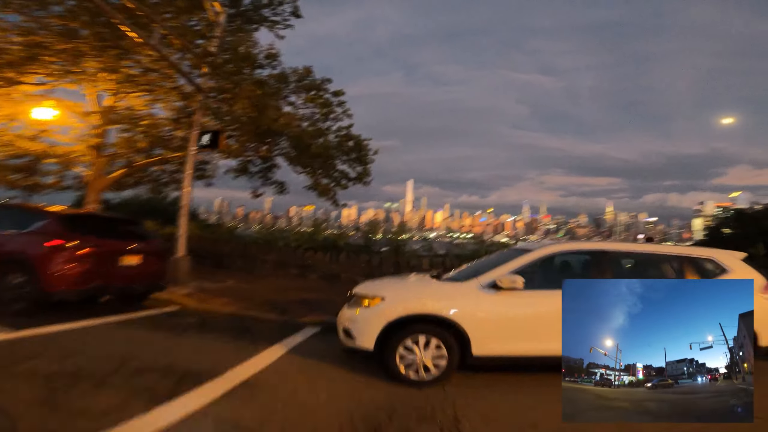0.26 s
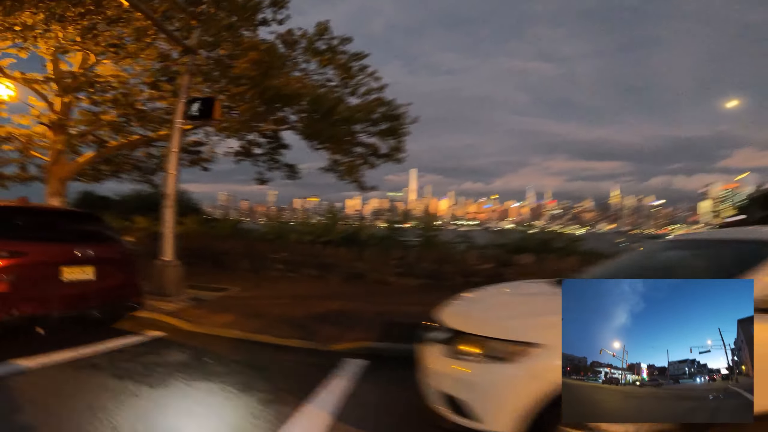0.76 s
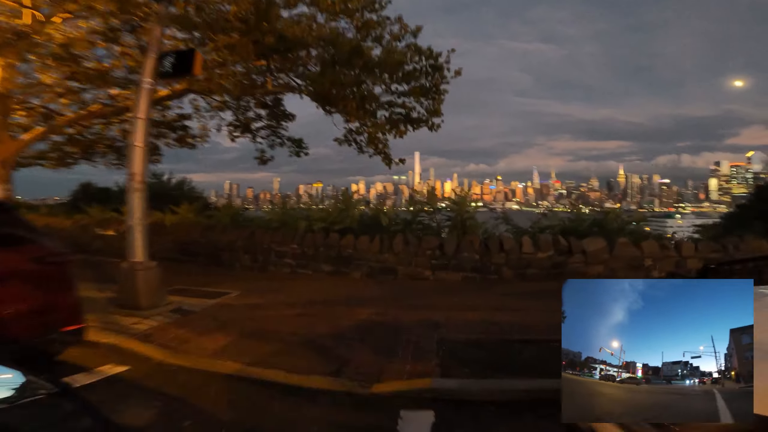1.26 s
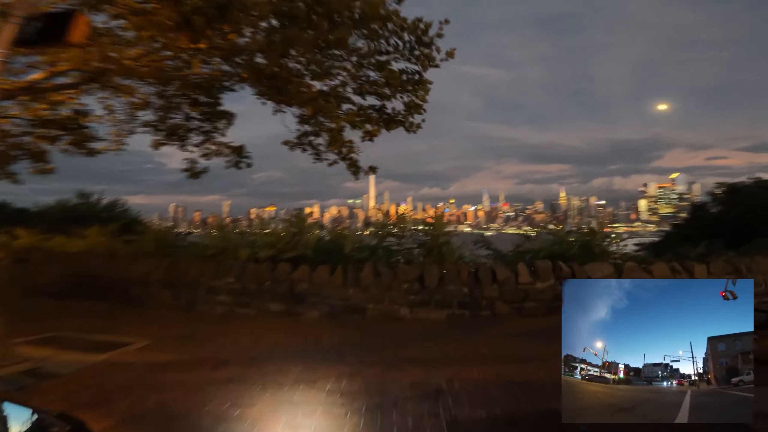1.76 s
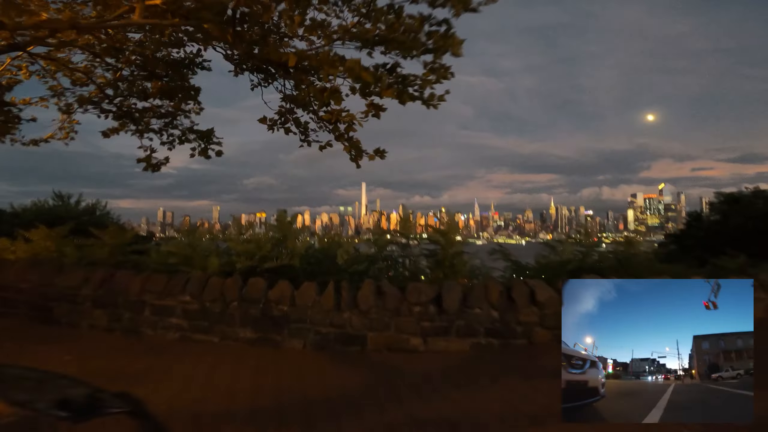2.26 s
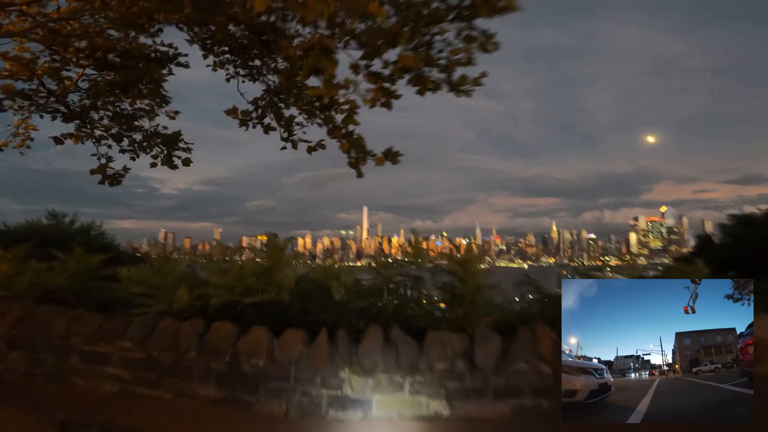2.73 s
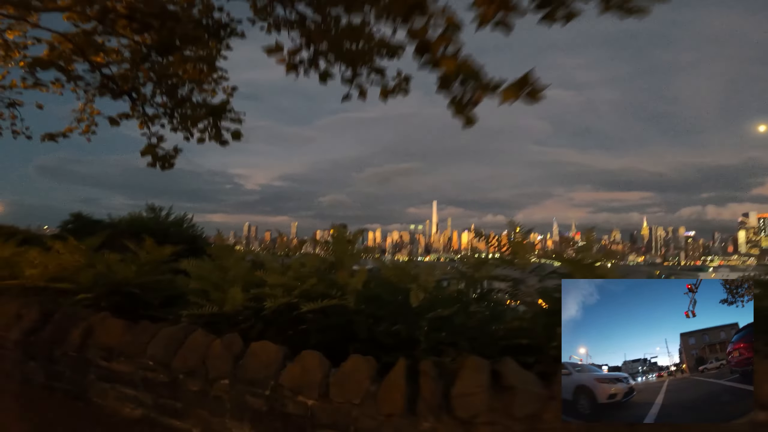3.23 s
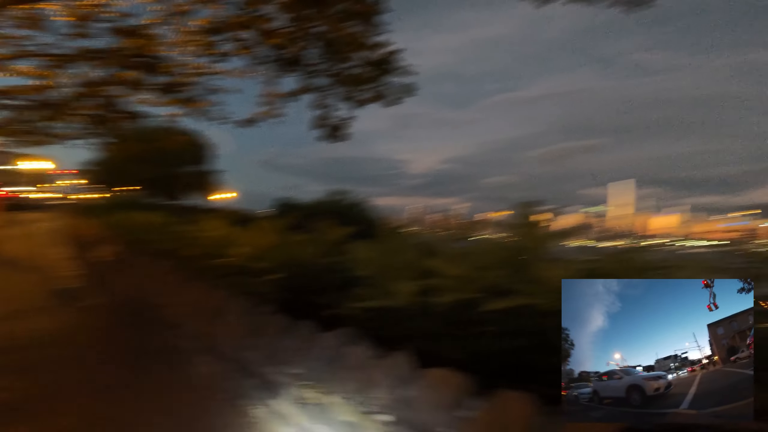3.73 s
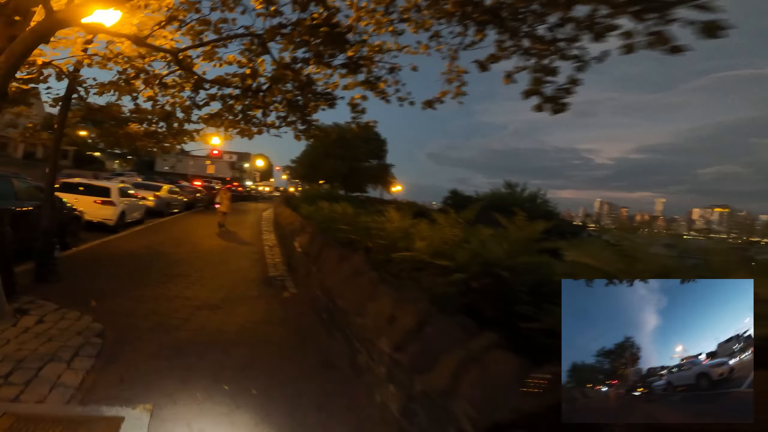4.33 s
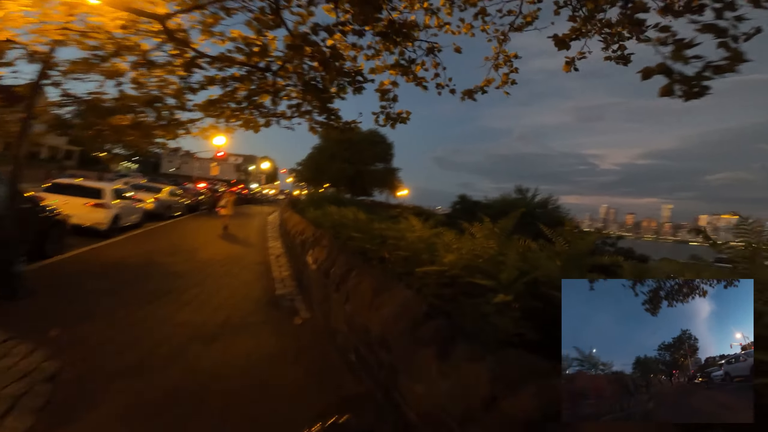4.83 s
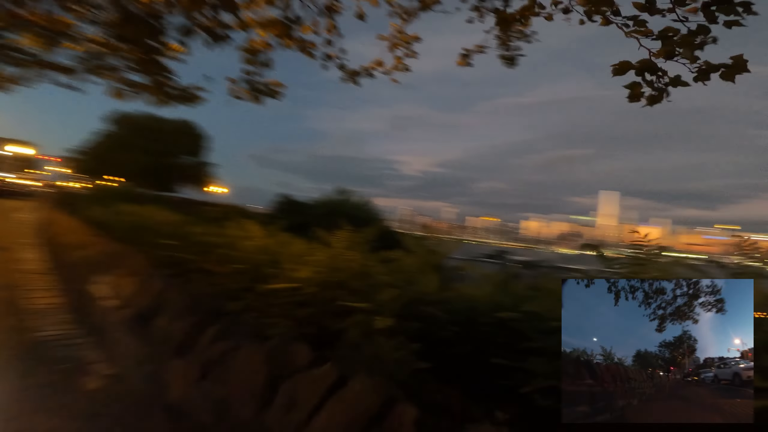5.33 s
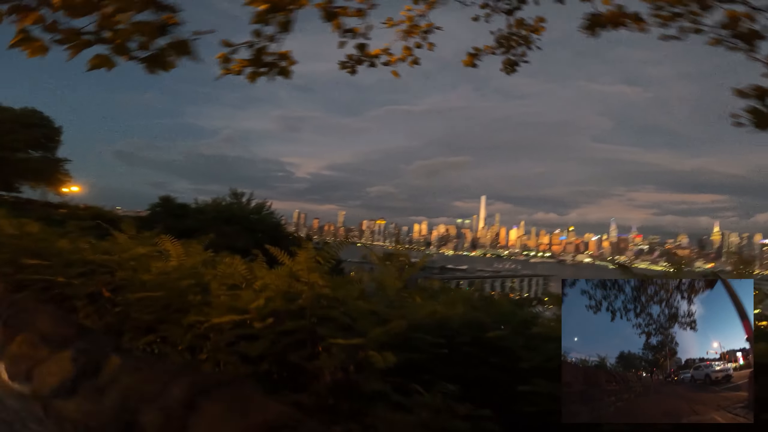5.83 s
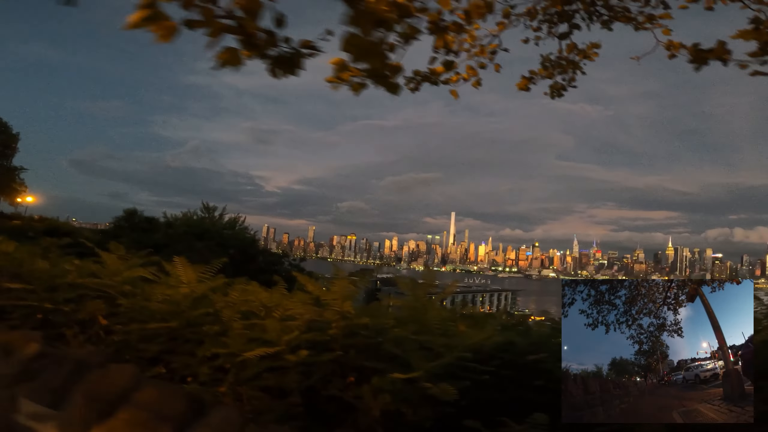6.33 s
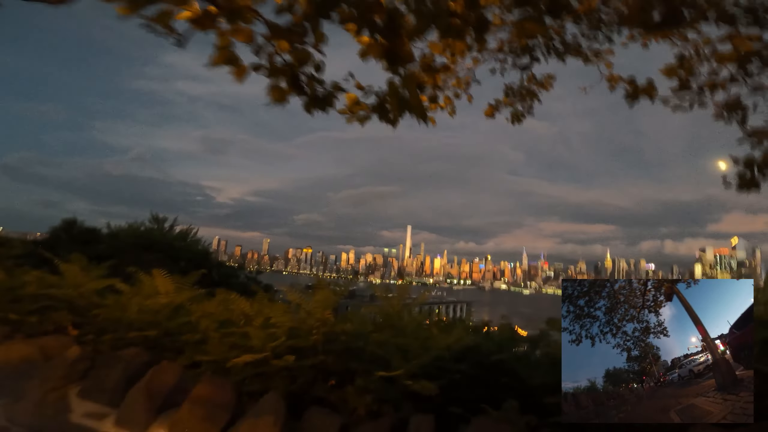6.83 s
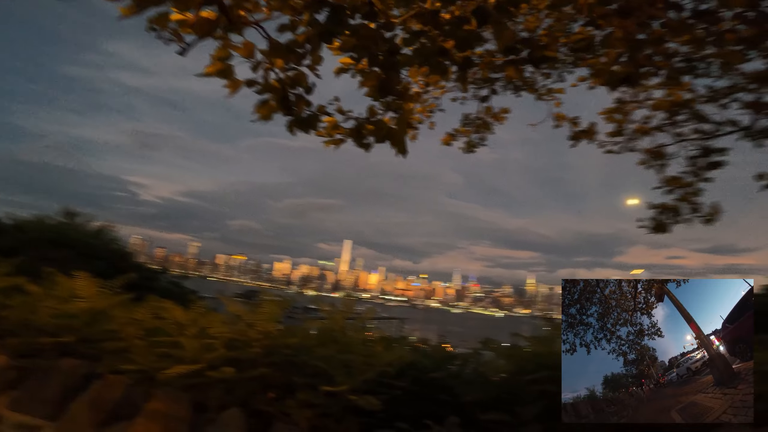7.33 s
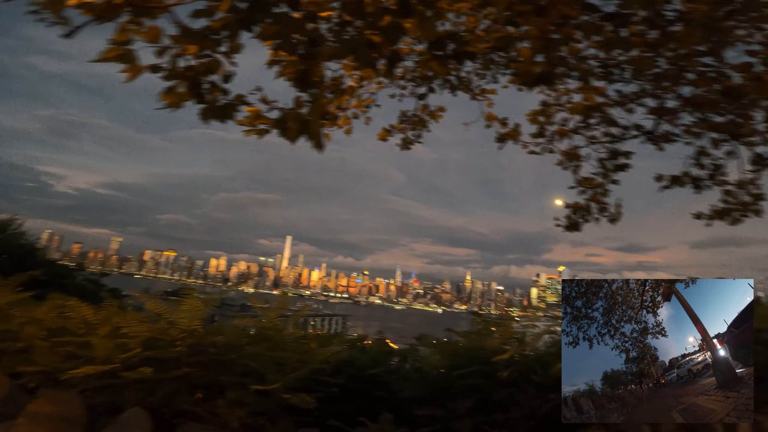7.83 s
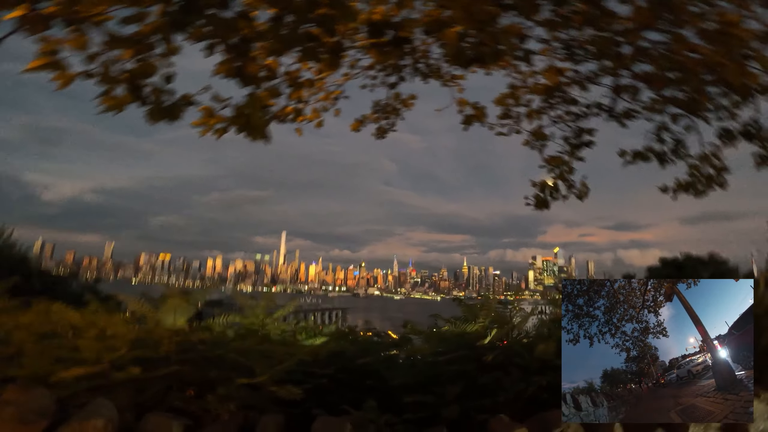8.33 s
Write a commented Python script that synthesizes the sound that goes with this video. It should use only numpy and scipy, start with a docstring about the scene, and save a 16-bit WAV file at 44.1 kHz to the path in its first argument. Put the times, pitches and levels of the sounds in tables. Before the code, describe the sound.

Close to the microphone, the disc brake of a slowly rolling electric bike gives two loud, high honks, then squeaks thinly as the pads drag. Rough paving sets loose metal parts clicking and knocking while the tyres hiss and crackle faintly on grit. The pads rub dryly and one last clatter follows. An engine idles nearby in the street throughout, and wind rumble on the microphone builds toward the end.

```python
"""A street at dusk, from a camera microphone on a slowly rolling electric bike; an engine idles nearby.
Close up, the disc brake sticks and slips in two honks, ducking the gain, and sings thinly as pads drag.
From about 3.6 s rough paving sets loose parts clicking and knocking; the tyres hiss and crackle on grit.
After 5 s the pads rub dryly, a last clatter comes near 8 s, and wind on the microphone builds to the end."""
import sys
import numpy as np
from scipy import signal
from scipy.fft import rfft, irfft, next_fast_len
from scipy.io import wavfile
from scipy.ndimage import uniform_filter1d

SR = 44100
rng = np.random.default_rng(int(sys.argv[2]) if len(sys.argv) > 2 else 0)


def inscribe(sig):
    """Save sig as 16-bit PCM at rate SR to the path in sys.argv[1].

    A 1-D sig is mono; a 2-D sig holds one channel per row.
    Samples are clipped to [-1, 1] before scaling.
    """
    pcm = np.round(np.clip(np.atleast_2d(sig).T, -1, 1) * 32767)
    wavfile.write(sys.argv[1], SR, pcm.astype(np.int16))


N = 378378
TIME = np.arange(N) / SR

# Table levels are relative: each source adds its own gain.
# hard braking: (start [s], length [s], pitch [Hz], level [dB], swell [dB/s], octave [dB], scrape [dB])
BRAKE_HONKS = [(-0.069, 0.31, 1543, -11.5, 1, -29, -38.5), (1.331, 0.22, 1539, -5, -20.5, -36, -36.5)]
# the pads bite harder and the honk's octave flares: (middle [s], length [s], level [dB])
OCTAVE_FLARES = [(0.003, 0.04, -19), (0.03, 0.01, -17), (0.08, 0.025, -14), (0.17, 0.067, -23.5),
                 (1.352, 0.023, -29.5), (1.387, 0.044, -24), (1.463, 0.042, -22.5), (1.51, 0.049, -26.5)]
# free ring of the disc: (pitch [Hz], t60 [s], level [dB])
DISC_MODES = [(1554, 0.84, -14.5), (1583, 1, -24), (1631, 1, -28), (2950, 0.2, -29.5)]
# pad scrape within a honk: (frequency [Hz], level [dB])
SCRAPE_COLOUR = [(800, -19), (1600, -6), (2200, 8.5), (3200, 7.5), (5000, 2.5), (7500, -5), (9500, -10),
                 (12500, -14), (15000, -27.5)]
# lower disc mode as the lever is let go: (middle [s], length [s], pitch [Hz], level [dB])
RELEASE_GROANS = [(0.185, 0.25, 1340, -33), (1.57, 0.21, 1329, -19)]
# light pad drag: (middle [s], length [s], pitch [Hz], level [dB], spoke rate [Hz], overtones [dB])
DRAG_SQUEALS = [(0.474, 0.14, 2395, -42, 21, -6), (0.948, 0.19, 2420, -47, 40, -8),
                (1.203, 0.16, 2466, -34, 24, -2), (1.28, 0.25, 2485, -41.5, 46, 1.5),
                (1.616, 0.28, 2410, -37, 22, -8), (1.748, 0.22, 2377, -33, 17, 2),
                (1.837, 0.13, 2397, -33, 16, -2), (1.901, 0.17, 2415, -32.5, 19, -7),
                (1.998, 0.18, 2389, -33.5, 22, 1), (2.069, 0.14, 2403, -28, 17.4, -1),
                (2.136, 0.101, 2437, -35.5, 23, -4), (2.207, 0.09, 2350, -35, 15, -4),
                (2.32, 0.22, 2380, -45, 13, -6), (3.781, 0.2, 2400, -30.5, 9, -2),
                (3.844, 0.12, 2390, -29.5, 12, -6), (3.885, 0.097, 2420, -30.5, 11, 0)]
# pad edge grazing the disc: (middle [s], length [s], level [dB])
EDGE_WHISTLES = [(0.772, 0.046, -65), (1.085, 0.1, -65), (1.282, 0.06, -65), (1.944, 0.04, -69),
                 (2.028, 0.04, -72), (5.785, 0.072, -64), (6.102, 0.036, -53), (6.27, 0.12, -52)]
# pads rubbing without locking into a tone: (middle [s], length [s], level [dB])
DRY_RUBS = [(5.63, 0.99, -52), (6.17, 0.47, -48.5), (7.04, 0.24, -46), (7.19, 0.3, -51.5), (7.4, 0.86, -51)]
# resonances of the rubbing pads: (frequency [Hz], width [Hz], level [dB])
PAD_MODES = [(2590, 110, 11.5), (3870, 120, -6), (4970, 110, -3.5), (5500, 3100, -20), (8340, 340, -19)]
# the disc brushing a pad: (middle [s], length [s], level [dB], ring [Hz])
PAD_BRUSHES = [(4.355, 0.06, -52, 5200), (4.665, 0.44, -57.5, 5400), (5.42, 0.17, -65, 5400),
               (6.892, 0.07, -55, 5400), (6.968, 0.03, -53, 6350), (7.44, 0.12, -61, 5000)]

# levers and cables snapping: (time [s], level [dB], treble [dB], ring [Hz], crack [dB], t60 [s])
LEVER_CLICKS = [(0.5222, -34, -30, 3120, 22, .04), (0.6976, -30.5, 4, 3430, 20, 0.034),
                (0.8375, -23.5, -4, 3170, 25, 0.062), (1.7715, -16, -6, 2460, 19, 0.049),
                (2.2832, -27, -37, 3600, 18, 0.056), (3.3, -32, -21, 2670, 21, .04),
                (3.9117, -13.5, -24, 4930, 26, 0.06), (3.9282, -13.5, -14, 4650, 32, 0.056),
                (4.1331, -32.5, -12, 2950, 29, .02), (4.1635, -31, -6, 2680, 22, .02),
                (4.1865, -30, -4, 3130, 23, .02), (4.2052, -13, 0, 3300, 15, 0.034),
                (4.258, -35, -9, 3300, 22, .02), (4.4121, -16, 1, 2600, 17, 0.039),
                (4.8951, -12, -12, 2200, 16, 0.078), (7.882, -29, -30, 2400, 20, .025),
                (7.9135, -19, -22, 4050, 12, .025), (7.9205, -24, -41, 3600, 8, .04),
                (7.9245, -12, -27, 3700, 33, .04), (7.9275, -13, -34, 3430, 23, 0.065)]
# body of a click: (frequency [Hz], level [dB])
CLICK_BODY = [(710, -48), (1200, -8), (1980, -7), (2360, -3.5), (3150, -7), (3450, -2), (3830, -5.5),
              (5150, -8.5), (8090, -10.5), (12600, -26.5), (13900, -33)]
# frame and fittings over bumps: (time [s], level [dB], treble [dB], ring [Hz], crack [dB], t60 [s])
FRAME_KNOCKS = [(0.762, -24.5, -26, 2264, 14, 0.11), (3.686, -21, -23, 1360, 22, 0.065),
                (3.706, -23, -24, 1543, 4, 0.11), (3.907, -16, -10, 1430, 20, 0.071),
                (4.017, -19.5, -35, 770, 4, 0.086), (4.026, -18, -27, 775, 14, 0.1),
                (4.726, -18.5, -36, 990, 16, 0.061), (5.3742, -36, -32, 1030, 19, .04),
                (5.39, -28.5, -18, 1182, 10, .05), (5.556, -18, -41, 1530, 18, 0.069),
                (5.6016, -24, -37, 1570, 15, 0.033), (5.616, -22.5, -18, 2320, 16, .07),
                (5.6216, -13.5, -39, 1600, 21.5, 0.059), (6.018, -34, -27.5, 2400, 22, .03),
                (6.0362, -30, -20, 1300, 20, .04), (6.066, -16, -25, 1660, 19, 0.064),
                (6.098, -22.5, -40, 1190, 18, .05), (6.1155, -23, -22, 1280, 10, 0.029),
                (6.1349, -24, -29, 1260, 20, .04), (6.174, -18, -31, 890, 14, 0.042),
                (6.2123, -17.5, -28, 1780, 19, 0.059), (6.22, -26, -15, 2510, 21, 0.11),
                (6.2985, -18.5, -22, 945, 13, 0.067), (6.64, -29.5, -20, 1100, 20, 0.11),
                (7.928, -19.5, -27, 428.7, 16, 0.032), (7.937, -23.5, -7, 1717, 18, 0.046)]
# body of a knock: (frequency [Hz], level [dB])
KNOCK_BODY = [(240, -58), (400, 3.5), (615, -1.5), (853, 0.5), (1120, 2.5), (1620, -1.5), (2080, 0.5),
              (3250, -2), (3940, -10), (4440, -6), (5080, -7), (6250, -15.5), (8170, -23), (13900, -45)]
# metal parts that every knock sets ringing: (pitch [Hz], t60 [s], level [dB])
FRAME_MODES = [(775, 0.16, 2), (914, 0.17, 11), (1110, 0.31, 0), (1310, 0.14, 12), (1581, 0.14, 13.5),
               (2010, 0.17, 0), (2357, 0.12, 12), (2810, .16, 4), (3420, 0.12, 2.5), (3820, .11, 11)]
# metal slipping on metal: (time [s], level [dB], pitch [Hz], t60 [s])
METAL_CHIRPS = [(3.584, -31, 3960, 0.053), (3.866, -32, 3550, 0.026), (3.9145, -13, 3950, 0.041),
                (3.9185, -19, 3950, 0.033), (3.9337, -14, 4015, 0.034), (3.943, -30, 3980, 0.078)]

# rough stretches of paving: (middle [s], length [s], hiss [dB], grit [dB])
ROUGH_PAVING = [(2.046, 1.1, -64.5, -86), (3.91, 0.67, -66, -64), (4.65, 1.7, -65.5, -63),
                (5.597, 0.85, -60, -63), (6.16, 0.58, -56, -54.5), (7.11, 0.83, -74, -61.5)]
# tread hiss: (frequency [Hz], level [dB])
TREAD_COLOUR = [(1200, -5.5), (2500, 13), (4000, 1), (5400, -1.5), (6500, -7.5), (8500, -11),
                (10500, -19.5), (13000, -23), (15500, -43.5)]
# popping grit: (frequency [Hz], level [dB])
GRIT_COLOUR = [(1500, -21), (4500, 1), (8500, -1), (11000, -9), (15000, -17)]
# steady airflow on the microphone: (time [s], level [dB])
AIRFLOW = [(0, -43), (1.3, -35), (2.3, -39.5), (3.3, -38), (4.4, -37.5), (6.3, -34.5), (7.6, -31),
           (8.58, -27)]
# gusts on top of it: (middle [s], length [s], level [dB])
WIND_GUSTS = [(3.7, 0.2, -42), (4.6, 0.46, -35.5), (5.52, 0.34, -30), (6.86, 0.37, -29.5),
              (8.12, 0.32, -36)]
# wind rumble: (frequency [Hz], level [dB])
WIND_COLOUR = [(12, -10), (25, 7.5), (50, 16), (80, -3.5), (150, -13), (300, -17.5), (700, -55)]
# how unlike the microphone's two ports hear the air: (frequency [Hz], side minus mid [dB])
AIR_WIDTH = [(25, -9.5), (60, -12), (125, -17.5), (250, -23), (500, -9.5), (1000, -9), (3000, -3.5),
             (8000, 0.5)]

# the idling engine's firing: (time [s], rate [Hz])
FIRING_RATE = [(0, 34.05), (3.4, 33.81), (8.58, 33.78)]
# its partials: (multiple of the firing rate [-], level [dB])
ENGINE_PARTIALS = [(1, -4), (2, 2.5), (3, 4), (4, -0.7), (5, 0.17), (6, -2), (7, -10), (8, -12), (9, -11),
                   (10, -24.5), (11, -25), (12, -16), (14, -28.5)]
# its exhaust puffs: (frequency [Hz], level [dB])
EXHAUST_COLOUR = [(30, -30.5), (80, 8.5), (200, -8), (400, -12.5), (700, -22.5), (2000, -55), (8000, -77)]
# the engine as heard from the bike: (time [s], level [dB])
ENGINE_LEVEL = [(0, -26), (0.5, -30.5), (1.0, -29.5), (1.5, -28), (1.85, -33.5), (2.4, -31), (3.1, -28),
                (3.7, -29), (4.5, -24.5), (5.3, -25.3), (6.1, -25.5), (7.0, -26.5), (8.0, -27.5),
                (8.58, -29)]
# extra distance its two wall echoes travel: (time [s], first [m], second [m])
ECHO_DETOURS = [(0, 25.89, 22.44), (0.6, 24.21, 22.31), (1.2, 25.04, 22.56), (1.8, 25.96, 22.43),
                (2.4, 22.74, 21.32), (3, 23.21, 21.25), (3.6, 21.17, 22.58), (4.2, 20.93, 23.48),
                (5, 23.4, 24.66), (5.8, 26, 23.86), (6.8, 29.04, 25.91), (7.6, 31.2, 25.65),
                (8.58, 34.73, 29.64)]
# strength and polarity of those echoes: (first [-], second [-])
ECHO_GAINS = [0.42, -0.35]
# rolling roar, growing with the pace: (time [s], level [dB])
ROAR_LEVEL = [(0, -45.5), (1.3, -44), (2.6, -44), (3.8, -40), (5.0, -40), (5.6, -38), (6.8, -39.5),
              (8.58, -38.5)]
# its spectrum: (frequency [Hz], level [dB])
ROAR_COLOUR = [(50, -9), (120, 0.5), (250, -1.5), (400, -6.5), (650, -14.5), (1050, -11.5), (1600, -18),
               (2500, -28), (4000, -31), (7000, -49.5), (12000, -75)]


def honk():
    """Close up, stick-slip locks to a disc mode; the pads scrape with each slip and the disc rings on."""
    sharp_hz, settle_s, sag_hz_per_s = 51.6, 0.0188, 110  # a honk starts sharp, settles, then sags
    judder_hz, judder_db = 11.74, 2.5  # the grip tightens and slackens as the disc turns
    lead_s, lead_db = 0.0299, -28.5  # the disc sings faintly just before the pads bite
    attack_s, linger_s = 0.037, 0.017  # the pads still scrape as the tone lets go
    hz = np.full(N, float(BRAKE_HONKS[0][2]))
    swing, octave, drag = np.zeros((3, N))
    for start, length, pitch, db, swell_rate, octave_db, scrape_db in BRAKE_HONKS:
        age = np.clip(TIME - start, 0, length)
        glide = pitch + sharp_hz * np.exp(-age / settle_s) - sag_hz_per_s * age
        hz = np.where(TIME >= start - lead_s, glide, hz)
        grip_db = -judder_db * np.cos(2 * np.pi * judder_hz * age)
        swing += undb(db + swell_rate * age + grip_db) * hold(start, length, attack_s, release=0.1) ** 1.03
        swing += undb(db + lead_db) * swell(start, 2 * lead_s)
        pressed = hold(start, length + linger_s, attack_s, release=0.069)
        octave += undb(octave_db) * pressed ** 2
        drag += undb(scrape_db + 0.6 * grip_db) * pressed
    phase = cycle(hz * (1 + 0.0029 * walk(130.7)))
    swing *= undb(0.8 * walk(110))
    flutter = undb(1.6 * walk(120))
    # uneven slips shake the overtones' phase; a hard bite locks the octave steady
    overtones = octave * flutter * np.sin(2 * phase + 0.22 * walk(280))
    overtones += swells(OCTAVE_FLARES) * np.sin(2 * phase)
    for k, partial_db in enumerate([-2.5, -5.0, -15.5, -19.0], 3):
        overtones += drag * undb(partial_db + 3.5 * walk(90)) * np.sin(k * (phase + 0.11 * walk(300)))
    tone = swing * np.sin(phase)
    for mode_hz, t60, mode_db in DISC_MODES:
        # each free mode stores a share of the swing and lets it go slowly
        decay = np.exp(-np.log(1000) / (t60 * SR))
        stored = signal.lfilter([1 - decay], [1, -decay], swing)
        tone += undb(mode_db) * stored * np.sin(2 * np.pi * mode_hz * TIME + 0.17 * walk(27))
    friction = colour(spread(side_db=-2.5), SCRAPE_COLOUR) * (1 + .5 * np.sin(phase))
    scrape = unit(friction) * drag * undb(5.0 + 0.62 * walk(60))
    rasp = echo(ports(np.sqrt(2) * overtones, left_db=-5.5), db=-11, t60=0.29)
    return ports(np.sqrt(2) * tone, left_db=-3.5) + rasp + echo(scrape, db=-7.5, t60=0.19)


def groan():
    """The disc drops to a lower, rougher mode as the pressure eases."""
    waver = 1 + 0.015 * walk(150)
    tone = sum(undb(db) * swell(middle, length) * np.sin(cycle(hz * waver))
               for middle, length, hz, db in RELEASE_GROANS)
    return ports(tone * undb(-2.5 + 2 * walk(80.3)))


def squeal():
    """Light drag sings on a higher mode; each spoke of the disc that passes the pad makes it pulse."""
    pulse_db = 4.5
    drag, pitch_sum, edge = np.full(N, 1e-9), np.zeros(N), np.zeros(N)
    for middle, length, hz, db, spoke_hz, edge_db in DRAG_SQUEALS:
        spokes = np.cos(2 * np.pi * spoke_hz * (TIME - middle))
        touch = swell(middle, length) * undb(db + pulse_db * spokes)
        drag += touch
        pitch_sum += hz * touch
        edge += undb(edge_db) * touch
    phase = cycle(pitch_sum / drag * (1 + 0.0016 * walk(140))) + 0.07 * walk(600)
    slip = phase + .14 * walk(200)
    overtones = sum(undb(db) * np.sin(k * slip) for k, db in enumerate([-14.5, -25.5, -44, -48.5], 2))
    overtones *= undb(0.8 * walk(70))
    flutter = undb(1.5 * walk(110))
    bite = (drag / drag.max()) ** 0.2 * edge / drag  # harder drag sounds brighter
    return ports(drag * flutter * (np.sin(phase) + bite * overtones), left_db=-6)


def whistle(hz=13230):
    """A very high, unsteady note from the pad's edge, scattered on its way up to the microphone."""
    pitch = hz * (1 + 0.0016 * walk(20) + .005 * walk(400))
    note = swells(EDGE_WHISTLES) * undb(5.5 + 2 * walk(70)) * np.sin(cycle(pitch))
    return echo(note * undb([[-2], [2]]), db=1.5, t60=.12)


def rub(chatter_hz=62, decay_s=0.004):
    """Dry pads catch and slip in uneven ticks that ring them; lighter brushes ring only one high mode."""
    noise = spread(side_db=-8)
    ticks = cycle(chatter_hz * np.exp(0.2 * walk(60))) / (2 * np.pi)
    slips = np.exp(-(ticks % 1) / (chatter_hz * decay_s)) + 0.27
    body = sum(undb(db) * resonate(noise * slips, hz, width) for hz, width, db in PAD_MODES)
    rubbing = unit(colour(body, [(6000, -6), (15000, -10)])) * swells(DRY_RUBS)
    for middle, length, db, hz in PAD_BRUSHES:
        brush = resonate(resonate(noise, hz, width_hz=310), hz, width_hz=310)
        rubbing += unit(brush) * undb(db) * swell(middle, length)
    return rubbing * undb(2 * walk(60))


def clicks():
    """Levers and cables snap, short and bright, close to the microphone."""
    return blows(LEVER_CLICKS, CLICK_BODY, modes=[], attack_s=0.002, ring_db=7, ring_width_hz=260,
                 gain_db=-13, tail_db=-10.5, tail_t60=0.21, side_db=-1)


def knocks():
    """Bumps jolt the frame and fittings under the rider and set their metal ringing."""
    return blows(FRAME_KNOCKS, KNOCK_BODY, FRAME_MODES, attack_s=0.0051, ring_db=14, ring_width_hz=85,
                 gain_db=-9.5, tail_db=-38, tail_t60=0.29, side_db=-5.5)


def blows(rows, body, modes, attack_s, ring_db, ring_width_hz, gain_db, tail_db, tail_t60, side_db):
    """Each blow: a crack, rebounding small parts and a faint street echo, through a ringing body."""
    count, rebounds_per_s, rebound_db = 12000, 220, 19.5
    out, t = np.zeros((2, N + count)), np.arange(count) / SR
    usual_treble_db = np.median(np.array(rows)[:, 2])
    for time, db, treble_db, ring_hz, crack_db, t60 in rows:
        mid, side, chatter, strike = rng.standard_normal((4, count))
        decay = undb(-60 * t / t60)
        rebounds = (rng.random(count) < rebounds_per_s / SR) * np.sign(mid) * undb(rebound_db) * decay
        envelope = (decay + undb(tail_db - 60 * t / tail_t60)) * np.minimum(t / attack_s + 0.075, 1)
        envelope *= undb(0.99 * unit(uniform_filter1d(chatter, size=50)))
        hit = (mid + undb(side_db) * np.array([side, -side])) * envelope + rebounds
        hit[:, 0] += undb(crack_db)
        tilt_db = 0.79 * (treble_db - usual_treble_db)
        hit = colour(colour(hit, body), [(1500, -tilt_db / 2), (6000, tilt_db / 2)])
        # each blow favours other modes
        metal = sum(undb(mode_db + 0.5 * chance) * resonate(hit, hz, np.log(1000) / (np.pi * mode_t60))
                    for (hz, mode_t60, mode_db), chance in zip(modes, strike))
        ring = undb(ring_db) * resonate(hit, ring_hz, ring_width_hz)
        hit = (hit + metal + ring) * undb([[-1.2], [1.2]])
        onset_rms = np.sqrt(np.mean(hit[:, :500] ** 2))
        start = int(time * SR)
        out[:, start:start + count] += hit * undb(db + gain_db) / onset_rms
    return out[:, :N]


def chirps(attack_s=0.0015):
    """Metal parts slip briefly and roughly against each other and ring."""
    out = np.zeros(N)
    grate = 0.35 * walk(2500)
    for start, db, hz, t60 in METAL_CHIRPS:
        age = np.clip(TIME - start, 0, 1)
        envelope = undb(db - 60 * age / t60) * np.minimum(age / attack_s, 1)
        out += envelope * np.sin(2 * np.pi * hz * TIME + grate)
    return ports(out * undb(2.2 * walk(700)))


def tyres(grains_per_s=200, crumble_s=0.0008):
    """Down at the paving the tread hisses, and grains of grit pop and crumble under the rubber."""
    tread = undb(-62) + swells([(middle, length, db) for middle, length, db, _ in ROUGH_PAVING])
    loose = undb(-78.5) + swells([(middle, length, db) for middle, length, _, db in ROUGH_PAVING])
    hiss = unit(colour(air(), TREAD_COLOUR)) * tread * undb(9.0 + 3.1 * walk(38))
    pops = rng.random(N) < grains_per_s / SR
    grains = pops * undb(3.5 * np.minimum(rng.exponential(size=N), 3))
    crumbling = signal.lfilter([1], [1, -np.exp(-1 / (crumble_s * SR))], grains)
    grit = colour(crumbling * rng.standard_normal((2, N)), GRIT_COLOUR)
    return hiss + unit(grit) * loose


def wind():
    """Right on the microphone, eddies buffet the ports in quick gusts."""
    flow = undb(curves(AIRFLOW)[0]) + swells(WIND_GUSTS)
    return unit(colour(air(), WIND_COLOUR + [(5000, -110)])) * flow * undb(2.9 * walk(16))


def engine(sound_m_per_s=343):
    """Somewhere near, each firing sends an uneven thump, heard as a drone, and a rough exhaust puff."""
    hz = curves(FIRING_RATE)[0]
    phase = cycle(hz * (1 + .003 * walk(12)))
    # two wall echoes make each partial swell and fade in its own time as the bike moves
    lags = [2 * np.pi * hz * metres / sound_m_per_s for metres in curves(ECHO_DETOURS)]
    drone = np.zeros(N)
    for k, db in ENGINE_PARTIALS:
        direct = k * phase + 0.59 * walk(2.044)
        echoes = sum(gain * np.cos(direct - k * lag) for gain, lag in zip(ECHO_GAINS, lags))
        drone += undb(db + 0.95 * walk(5)) * (np.cos(direct) + echoes)
    firings = np.exp(-(phase / (2 * np.pi) % 1) / 0.057)
    puffs = colour(rng.standard_normal(N) * firings, EXHAUST_COLOUR)
    level = undb(curves(ENGINE_LEVEL)[0] + 1.2 * walk(30))
    return ports((unit(drone) + unit(puffs) * undb(-10.5)) * level, left_db=-0.5)


def road():
    """Behind everything, the rolling roar of tyres and street."""
    return unit(colour(air(), ROAR_COLOUR)) * undb(curves(ROAR_LEVEL)[0] + 7.0 + 0.83 * walk(14))


def air():
    """Two-channel noise, alike in the low middle and less alike at both ends."""
    mid, side = rng.standard_normal((2, N))
    side = colour(side, AIR_WIDTH)
    return np.array([mid + side, mid - side])


def echo(x, db, t60, count=16000):
    """A sound with its short, diffuse return from the ground, cars and walls."""
    t = np.arange(count) / SR
    response = rng.standard_normal((2, count)) * undb(-60 * t / t60) * np.minimum(t / 0.0078, 1)
    response /= np.sqrt(np.sum(response ** 2, axis=1, keepdims=True))
    return x + undb(db) * signal.fftconvolve(x, response, axes=1)[:, :N]


def ports(x, left_db=-3):
    """Sound reaches the microphone's left port first; the right one hears it a little louder."""
    return np.array([x * undb(left_db / 2), np.roll(x, shift=2) * undb(-left_db / 2)])


def spread(side_db):
    """Two-channel noise: a shared part and an opposed part."""
    mid, side = rng.standard_normal((2, N))
    return np.array([mid + undb(side_db) * side, mid - undb(side_db) * side])


def colour(x, points):
    """Causal filter with the outline (frequency [Hz], level [dB])."""
    hz, db = np.transpose(points)
    size = next_fast_len(x.shape[-1] + 8192, True) // 2 * 2
    bin_hz = np.arange(size // 2 + 1) * SR / size
    gain = undb(np.interp(np.log(bin_hz + 1), np.log(hz), db))
    cepstrum = irfft(np.log(gain))
    cepstrum[1:size // 2] *= 2  # fold to minimum phase
    cepstrum[size // 2 + 1:] = 0
    return irfft(rfft(x, size) * np.exp(rfft(cepstrum)))[..., :x.shape[-1]]


def resonate(x, hz, width_hz):
    """One resonance, gain 1 at its centre."""
    return signal.lfilter(*signal.iirpeak(hz, hz / width_hz, fs=SR), x)


def cycle(hz):
    """Phase of a vibration with moving pitch."""
    return 2 * np.pi * np.cumsum(hz) / SR


def walk(rate_hz):
    """Smooth random wavering with rms 1."""
    step = max(int(SR / rate_hz), 2)
    held = np.repeat(rng.standard_normal(N // step + 1), step)
    return unit(uniform_filter1d(uniform_filter1d(held, step), step)[:N])


def swell(middle, length):
    """A smooth rise and fall around a moment."""
    near = np.abs(TIME - middle) < length / 2
    return near * np.cos(np.pi * (TIME - middle) / length) ** 2


def swells(rows):
    """Gain of a series of swells (middle [s], length [s], level [dB])."""
    return sum(undb(db) * swell(middle, length) for middle, length, db in rows)


def hold(start, length, attack, release):
    """Straight attack, hold and release, in seconds."""
    return np.clip(np.minimum((TIME - start) / attack, (start + length - TIME) / release), 0, 1)


def curves(rows):
    """Each column after the first, joined by straight lines in time."""
    times, *columns = np.transpose(rows)
    return [np.interp(TIME, times, column) for column in columns]


def undb(db):
    """Decibels to gain."""
    return np.exp(np.asarray(db) * (np.log(10) / 20))


def unit(x):
    """Scale to rms 1."""
    return x / np.sqrt(np.mean(x ** 2))


def gain_control(x, ceiling_db=-12, recovery_db_per_s=6.5, first_duck_db=6):
    """Loud sound pushes the camera's gain down at once; it creeps back at a steady rate."""
    power = uniform_filter1d(np.mean(x ** 2, axis=0), size=1300)
    over_db = np.maximum(10 * np.log10(np.maximum(power, 1e-12)) - ceiling_db, 0)
    over_db[0] = first_duck_db
    recovered_db = recovery_db_per_s * TIME
    duck_db = np.maximum.accumulate(over_db + recovered_db) - recovered_db
    return x * undb(-uniform_filter1d(duck_db, size=300))


def scene():
    """From the rider's place: brake and rattles close by, with engine, wind and street around them."""
    singing = echo(squeal(), db=-16, t60=.25)
    brake = honk() + groan() + singing + whistle() + rub()
    rattles = clicks() + knocks() + chirps()
    return brake + rattles + engine() + wind() + road() + tyres()


def record(dry):
    """The camera ducks under the honks and cuts the top of the treble."""
    top_hz = 15200
    lowpass = signal.ellip(8, .2, 70, top_hz, fs=SR, output="sos")
    return signal.sosfilt(lowpass, gain_control(dry))


dry = scene()
out = record(dry)
inscribe(out)
```